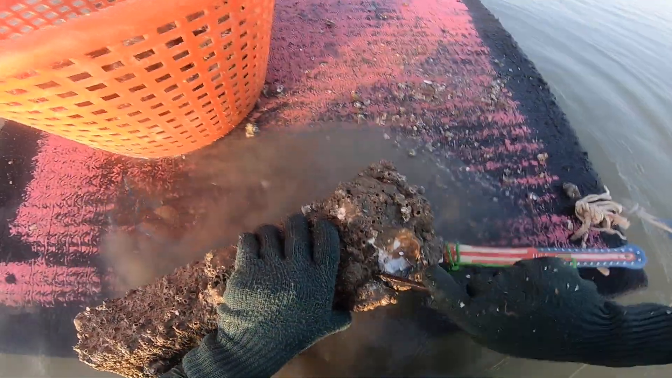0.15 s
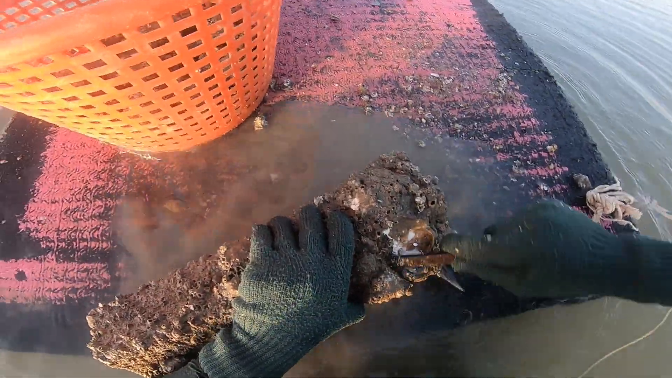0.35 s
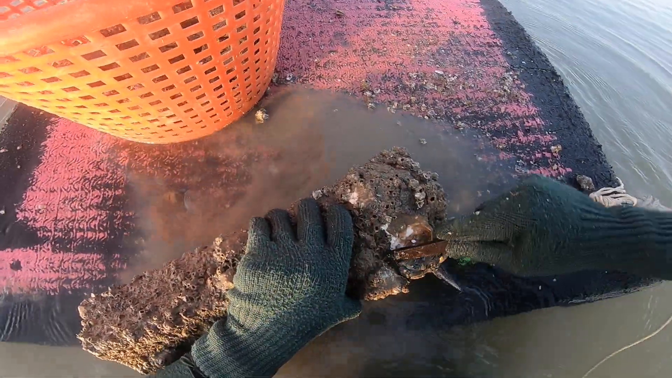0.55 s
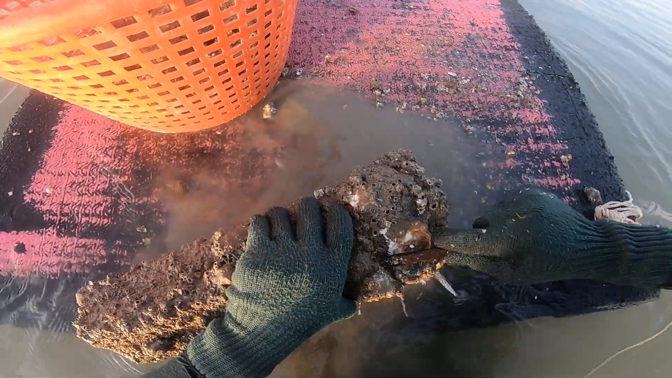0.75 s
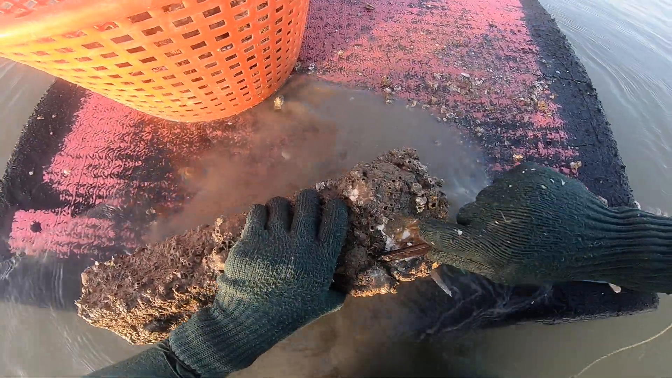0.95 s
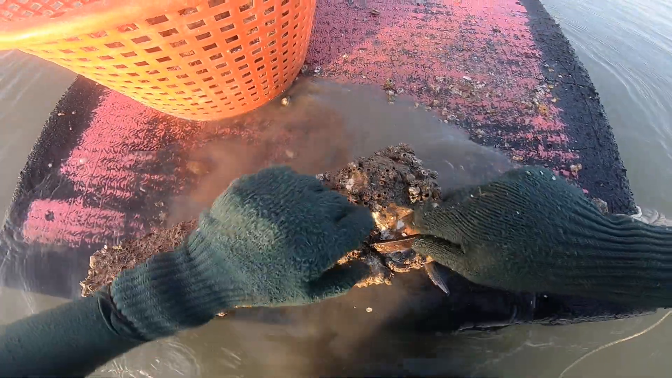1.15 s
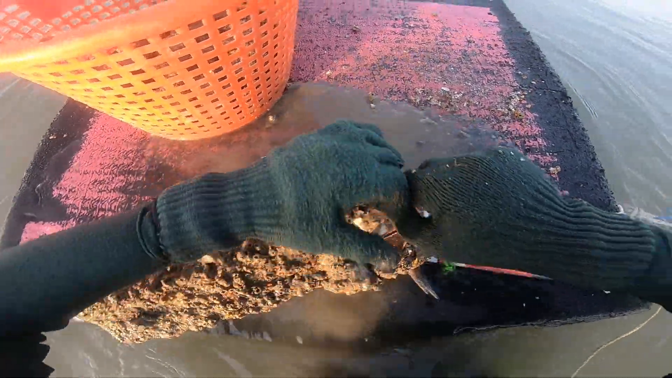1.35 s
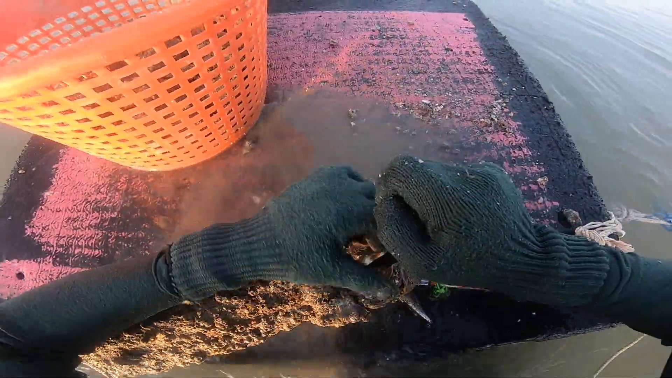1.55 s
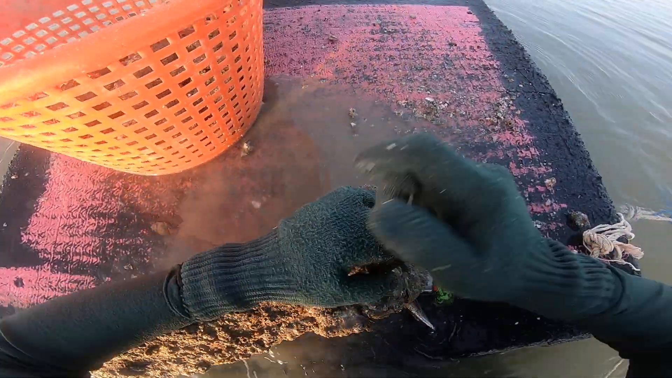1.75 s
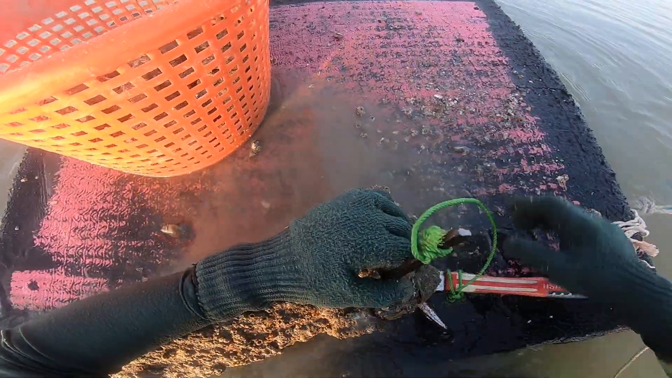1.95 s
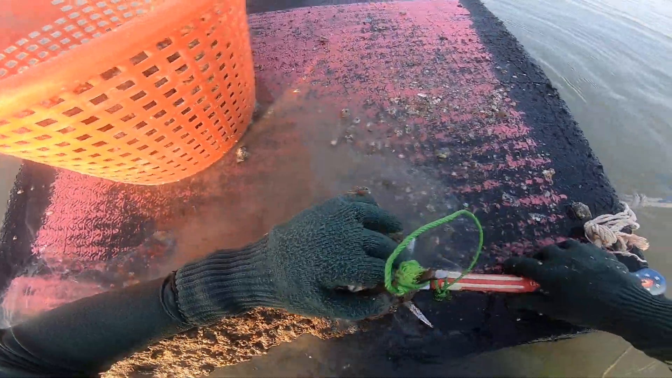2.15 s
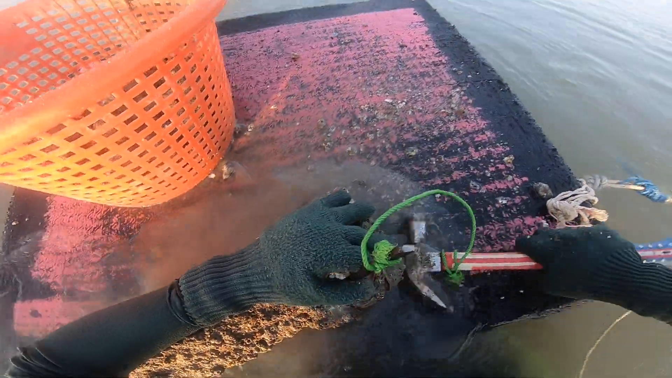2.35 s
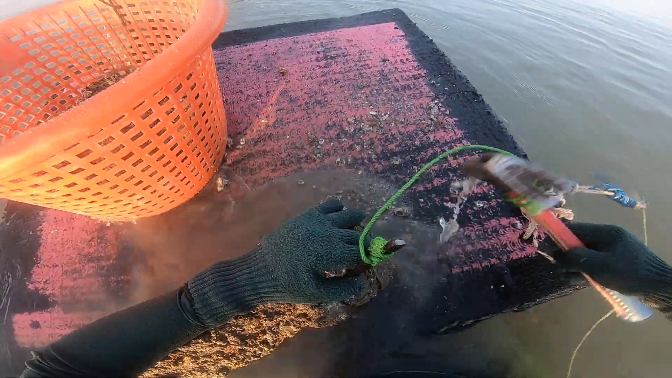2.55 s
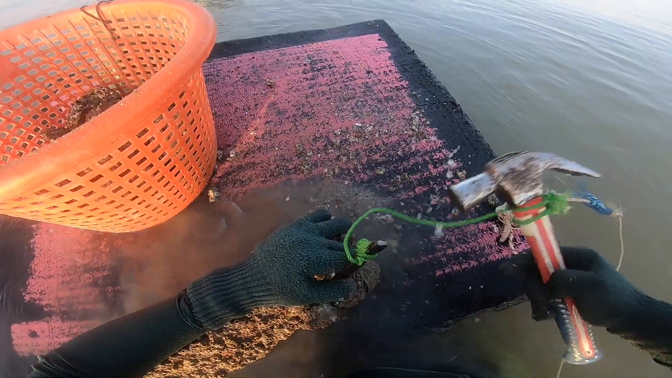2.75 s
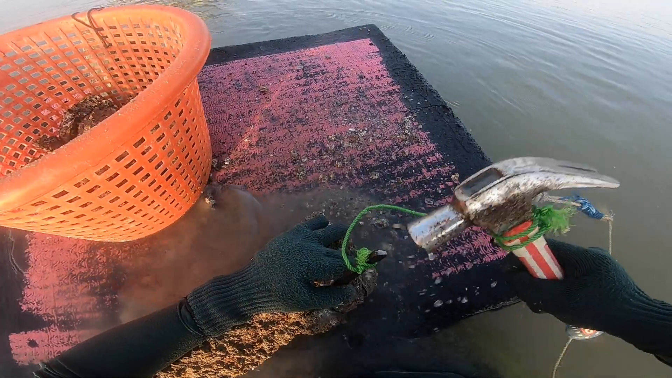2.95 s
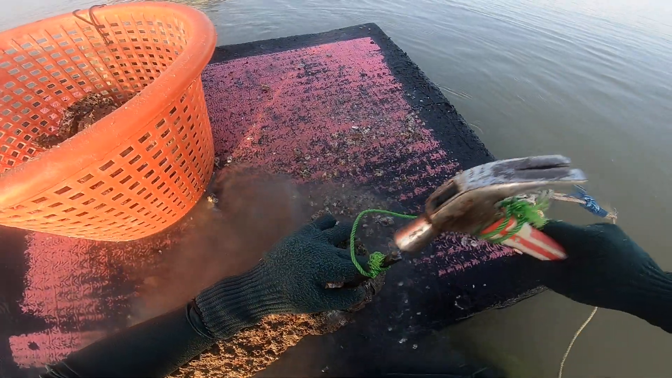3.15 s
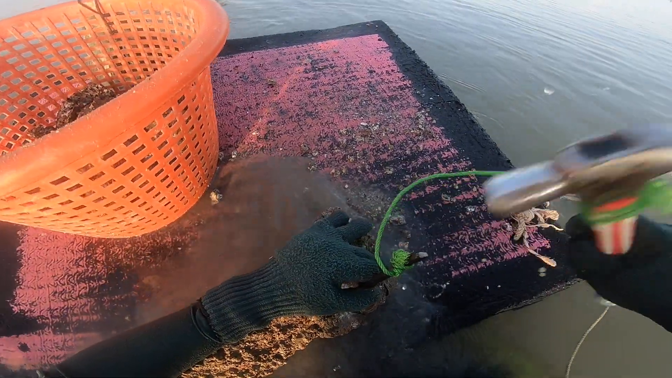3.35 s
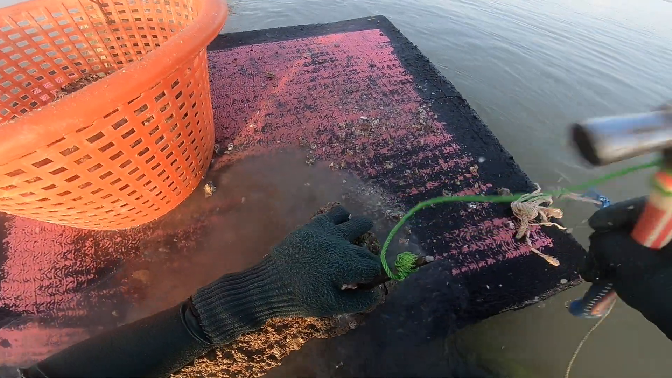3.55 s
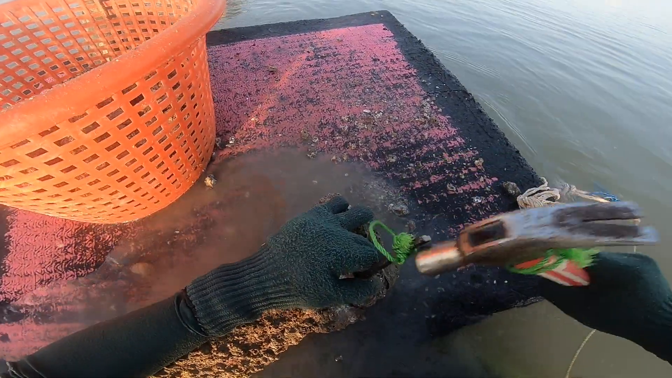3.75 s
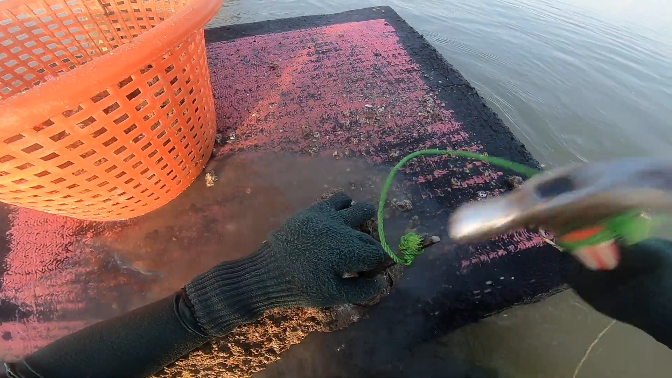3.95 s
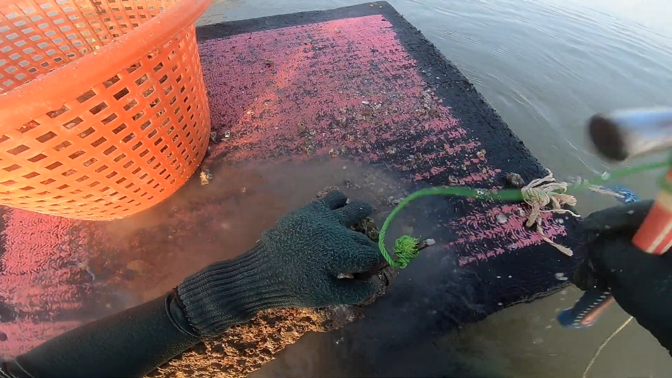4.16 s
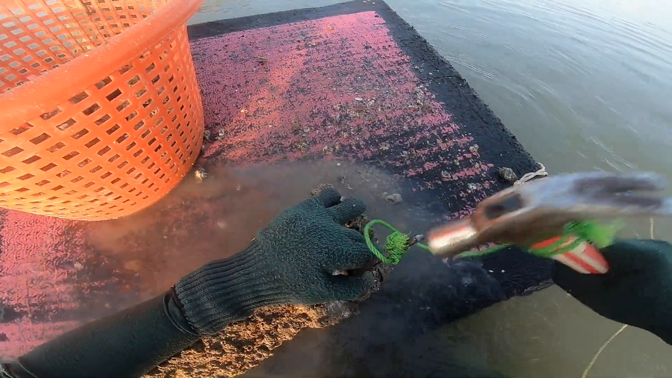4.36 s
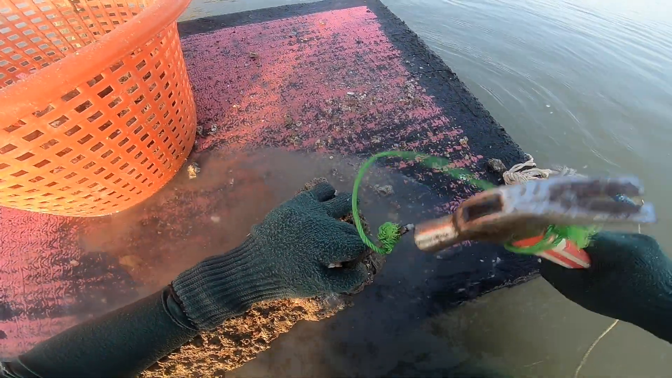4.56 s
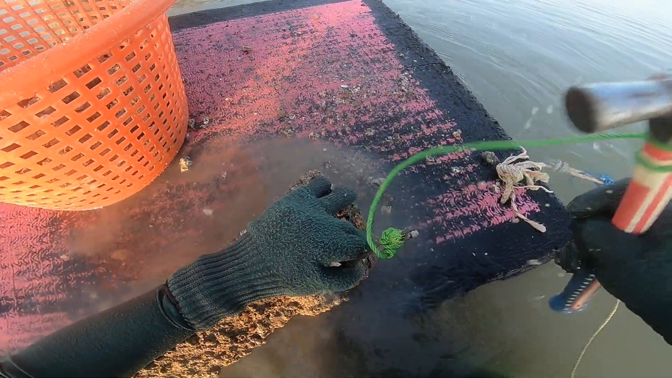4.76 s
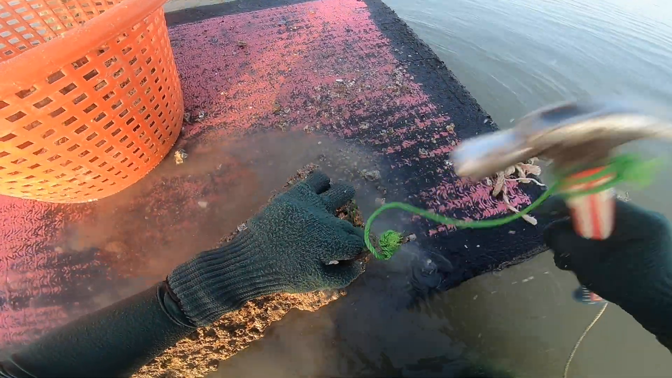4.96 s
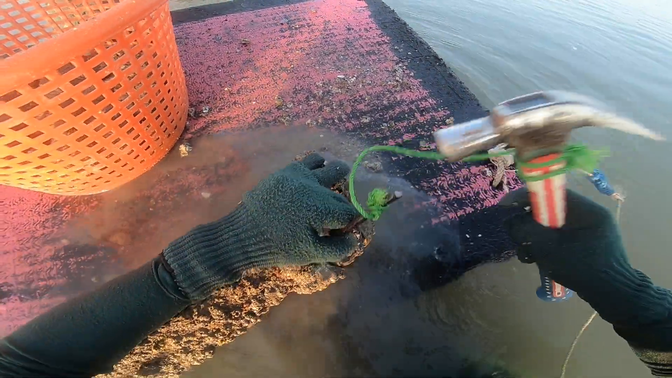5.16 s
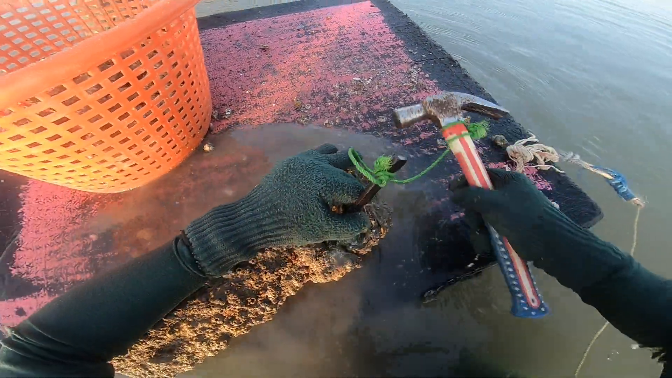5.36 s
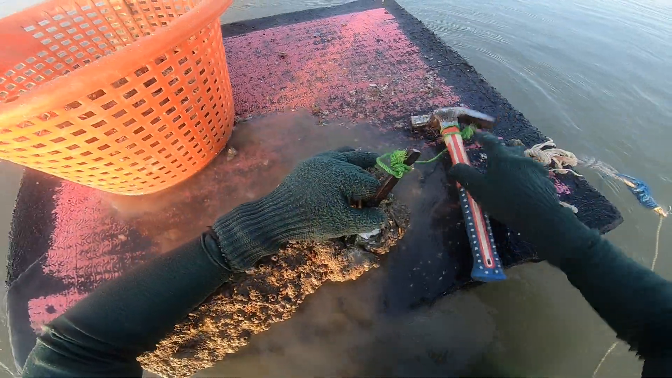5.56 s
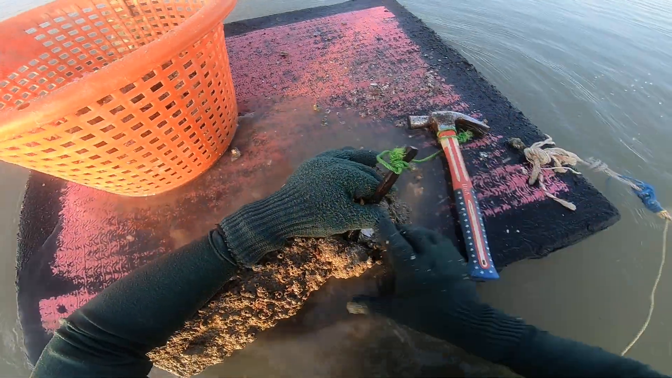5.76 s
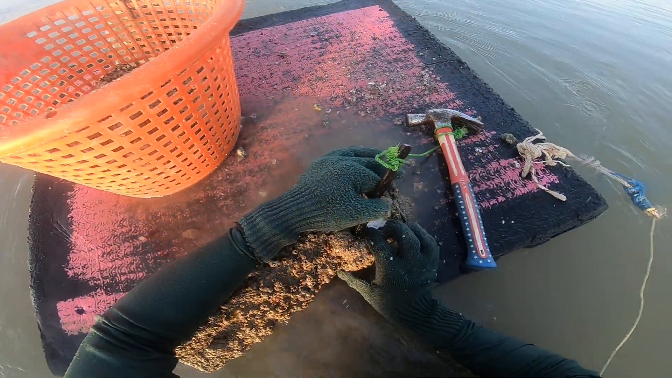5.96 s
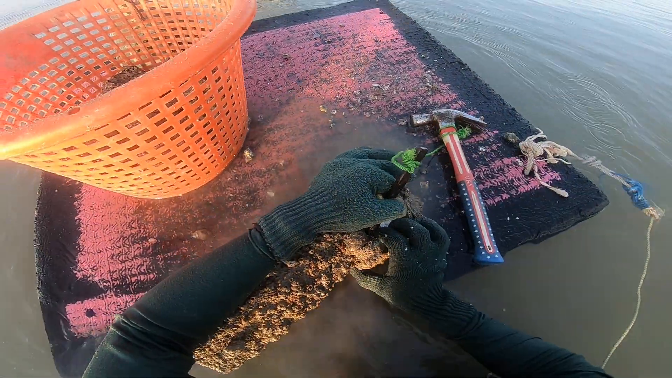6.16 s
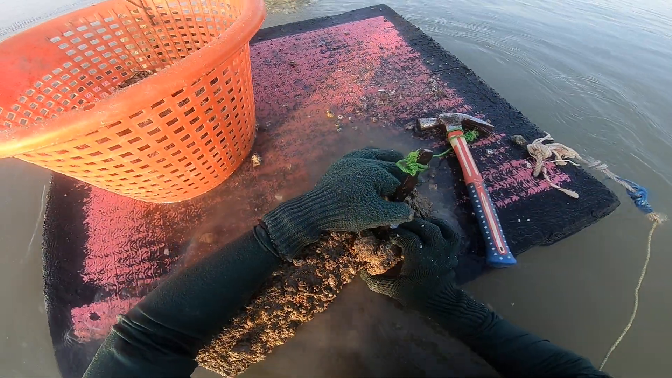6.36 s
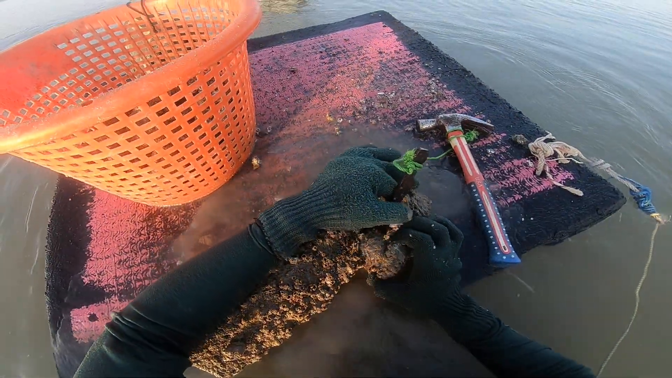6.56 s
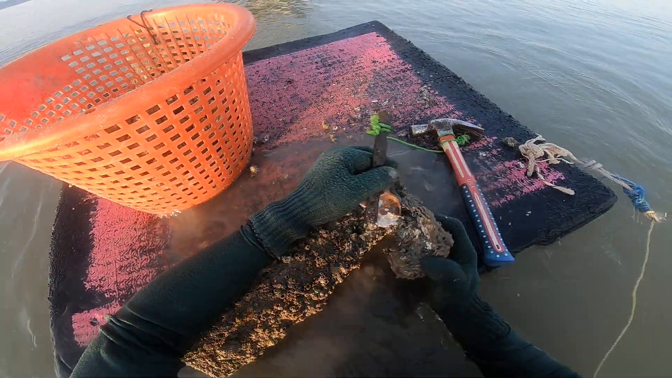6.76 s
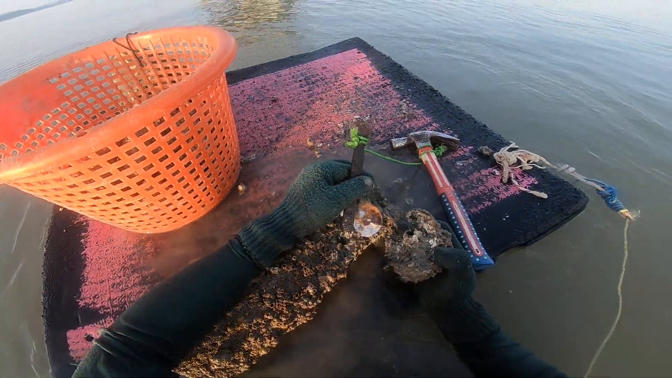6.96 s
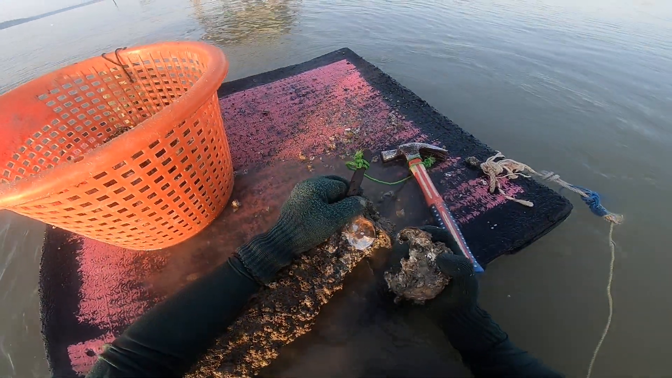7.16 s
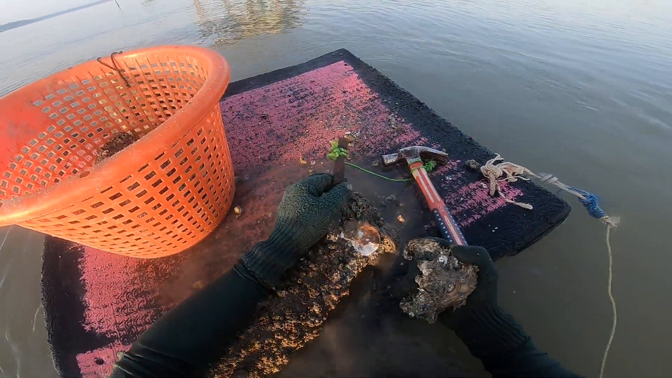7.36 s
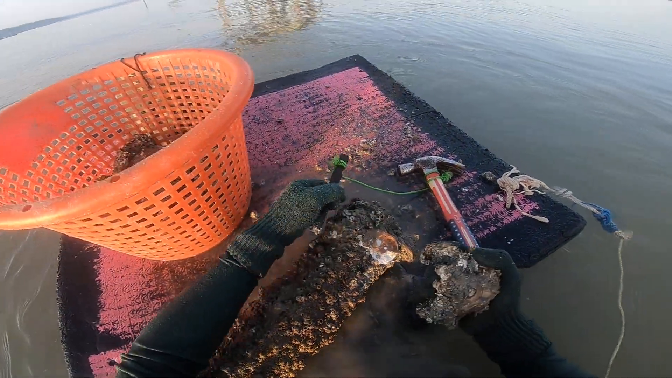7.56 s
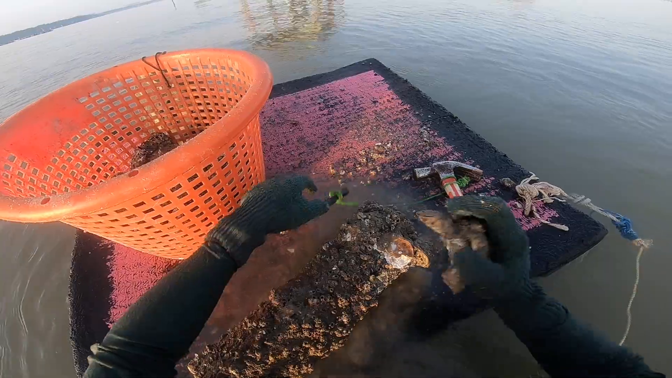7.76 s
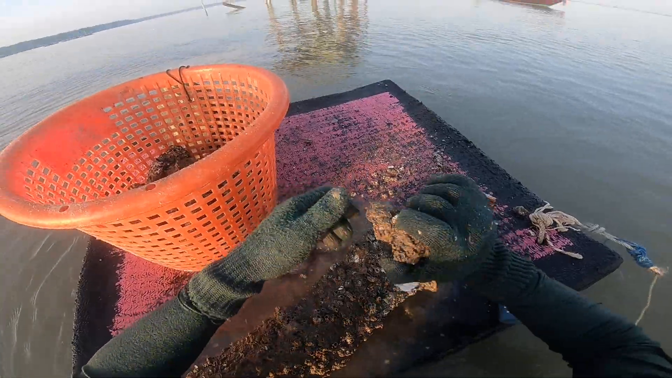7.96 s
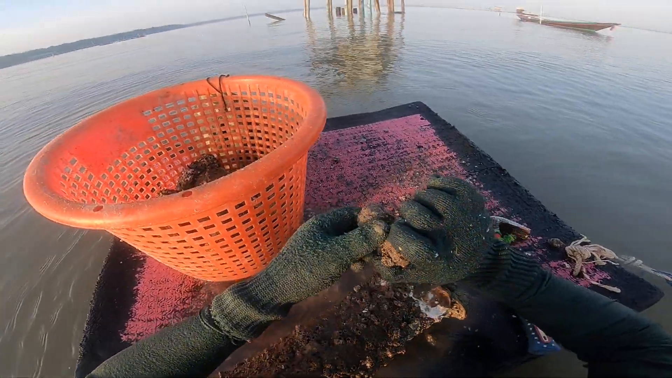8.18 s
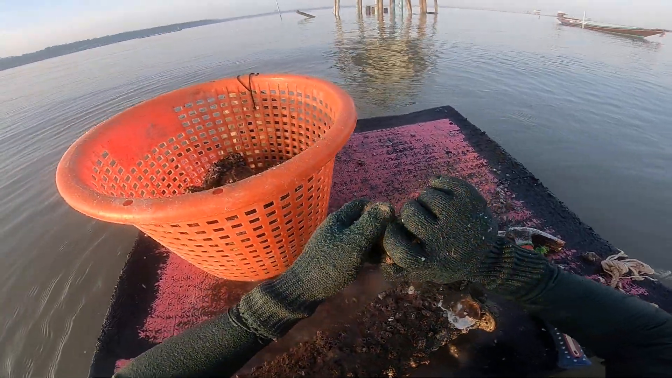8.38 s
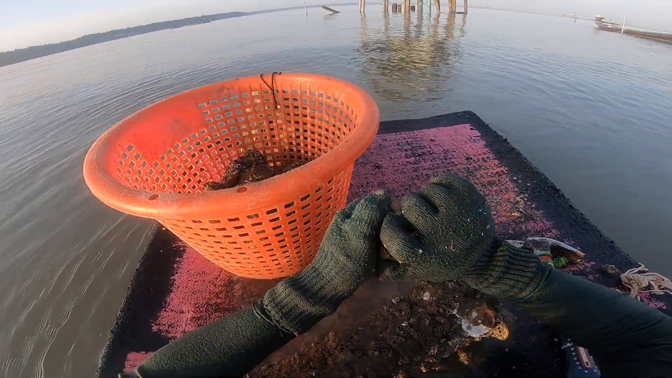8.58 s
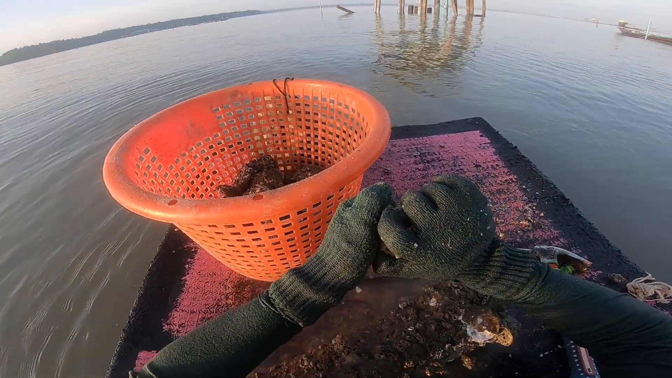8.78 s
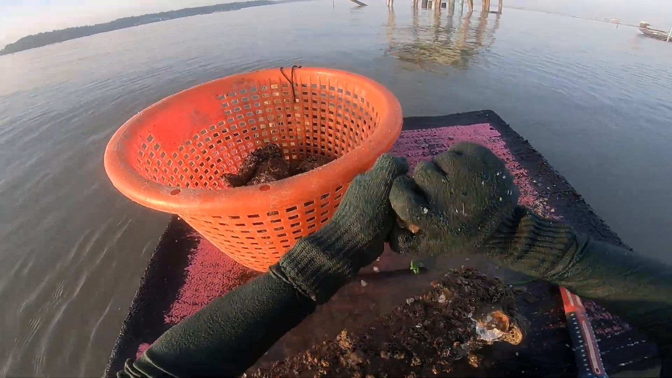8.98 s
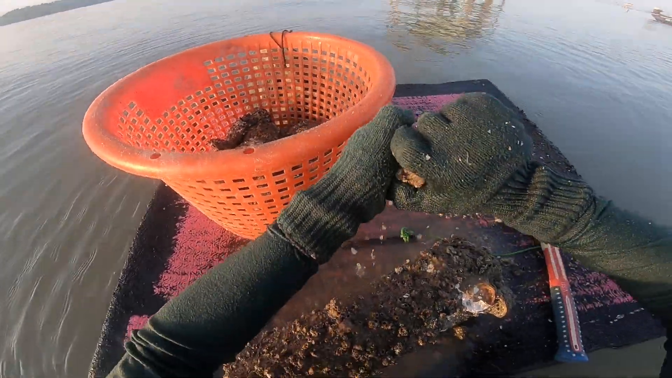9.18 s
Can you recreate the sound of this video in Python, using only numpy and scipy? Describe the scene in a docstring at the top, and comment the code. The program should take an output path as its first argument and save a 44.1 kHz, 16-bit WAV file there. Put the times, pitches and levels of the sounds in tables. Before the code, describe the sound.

A distant one-cylinder engine putters while a hammer cracks brightly on steel seven times, then crusty shells scrape and break apart by hand.

```python
"""A one-cylinder boat engine chugs across the water as periodic pulses ringing a resonant pipe and casing.
With it from the start come wind rumble, fizzing run-off (filtered noise) and the picking of oyster shells.
Water drips and splashes, a hammer is picked up, and seven blows on a steel knife excite decaying modes:
it bounces, the raft deck heaves and rocks, and the last two blows sound hollow. The hammer is laid down, then
shell scrapes on shell and snaps as it is broken free by hand, while the stereo image narrows to mono."""
import sys
import numpy as np
from scipy import signal
from scipy.fft import rfft, irfft, next_fast_len
from scipy.io import wavfile
from scipy.ndimage import uniform_filter1d, minimum_filter1d

SR = 44100
rng = np.random.default_rng(int(sys.argv[2]) if len(sys.argv) > 2 else 0)


def dump(signal):
    """Clip the signal to [-1, 1] and save it as 16-bit WAV at the path in sys.argv[1]."""
    limited = np.clip(np.atleast_2d(signal).T, -1, 1)
    pcm = np.round(limited * 32767).astype(np.int16)
    wavfile.write(sys.argv[1], SR, pcm)


N = 406590
TIME = np.arange(N) / SR
SIZE = next_fast_len(N + SR // 2, True) // 2 * 2  # even transform length, padded against wrap-around
BINS_HZ = np.maximum(np.arange(SIZE // 2 + 1) * SR / SIZE, 1)

# Levels are relative: the functions add weights to them. Noise spectra give a shape only.
# Engine speed: (time [s], firing rate [1/s])
FIRING_RATE = [(0.0, 33.74), (0.6, 33.27), (1.2, 33.02), (1.8, 33.2), (3.0, 33.19), (3.6, 32.98),
               (4.3, 33.34), (5.0, 33.16), (5.6, 33.36), (6.2, 33.04), (6.8, 33.39), (7.4, 33.36),
               (8.0, 33.6), (8.6, 33.32), (9.2, 32.93)]
# Engine loudness: (time [s], exhaust level [dB], clatter level [dB])
ENGINE_LEVEL = [(0.0, -52.5, -61), (0.77, -50.5, -60.5), (1.13, -50.5, -66), (1.56, -47.5, -60),
                (2.18, -49.5, -62), (2.67, -47.5, -59), (3.59, -58, -62.5), (5.13, -52.5, -67.5),
                (5.42, -50.5, -63.5), (8.63, -51, -66.5), (9.22, -52, -65.5)]
# Exhaust pipe resonances: (frequency [Hz], bandwidth [Hz], level [dB])
PIPE_MODES = [(158, 180, 7), (209.9, 20.5, 15), (274, 30, -1), (335, 13.7, -3), (484, 22, -19)]
# Exhaust reflections off nearby surfaces: (delay [s], level [dB])
EXHAUST_ECHOES = [(.0072, 1.5), (0.0117, 0.5), (0.0167, -13)]
# Exhaust gas noise: (frequency [Hz], spectral density [dB])
GAS_SPECTRUM = [(50, -19.5), (100, -21.5), (140, 3), (195, 6), (260, -2.5), (350, -4), (450, -16.5),
                (600, -36.5), (1000, -55)]
# Harmonics of the firing rate: (frequency [Hz], level of a harmonic there [dB])
HUM_SPECTRUM = [(130, -1), (165, -9.5), (198, -2.5), (232, -7), (266, -9), (332, -7.5), (366, -8),
                (400, -21.5), (530, -21.5)]
# Loudness of that hum: (time [s], level [dB])
HUM_LEVEL = [(0, -57), (.5, -52), (1.0, -60), (2.0, -57), (2.9, -53), (4.4, -56), (5.2, -70)]
# Clatter noise in the wide and in the mono image: (frequency [Hz], spectral density [dB])
CLATTER_WIDE_SPECTRUM = [(450, -3.5), (600, 3), (800, 9.5), (1000, 3.5), (1300, 7), (1900, 7), (2600, 6),
                         (2950, -8), (3400, 7.5), (4000, -14), (5400, -15), (7500, -12), (8600, -26),
                         (14000, -59)]
CLATTER_MONO_SPECTRUM = [(450, 3), (560, 0), (780, 11), (1000, -1), (1350, 4.5), (1850, 9), (2700, 1),
                         (3400, 6), (3900, -1), (5600, -17.5), (6800, -8), (8000, -17.5), (12000, -24),
                         (15000, -44)]
# Engine casing modes: (frequency [Hz], level in wide image [dB], level in narrow image [dB], T60 [s])
CASING_MODES = [(3358, -7.5, -9, 0.024), (2608, -3.5, -25, 0.015), (2320, -14.5, -16.5, 0.042),
                (1850, -10, -11.5, 0.024), (4580, -28, -9, 0.003), (5110, -20.5, -6, 0.0088)]
# Rattle of a second engine slipping against the firing: (time [s], turns lost per second [1/s]; negative gains)
RATTLE_SLIP = [(0, .3), (1.2, .5), (1.8, 1.5), (2.4, 1.1), (2.9, -.1), (3.9, -.12), (4.4, .6), (5.5, .15),
               (6.3, .3), (7, 1)]
# Casing rattle against the rest of the clatter: (time [s], level [dB])
RATTLE_LEVEL = [(0.3, -1), (2.0, -1), (3.3, 1), (4.6, -1), (5.42, 5), (5.8, 0), (8.0, -2)]
# Reflection of the ticks off the deck as the head moves: (time [s], delay [s])
DECK_ECHO_DELAY = [(6.5, 0.000913), (6.9, 0.00093), (7.3, 0.00096), (7.8, 0.00088), (8.25, 0.00094),
                   (8.6, 0.001), (9.2, 0.00068)]
# Steady breeze on the microphone: (time [s], level [dB])
BREEZE_LEVEL = [(0.0, -34), (2.39, -46), (3.13, -45), (3.62, -36.5), (4.65, -43), (4.88, -34),
                (5.44, -53.5), (5.8, -43.5), (7.19, -71), (7.45, -56.5), (8.65, -61), (9.12, -33),
                (9.22, -49.5)]
# Gusts on the microphone: (peak time [s], level [dB])
GUSTS = [(0.083, -17), (0.429, -29), (0.756, -19.5), (5.479, -33), (5.898, -31), (7.62, -43.5),
         (8.97, -28.5)]
# Low turbulence: (frequency [Hz], spectral density [dB])
RUMBLE_SPECTRUM = [(10, -11), (18, 8), (27, 0.5), (40, 0), (55, -8), (80, -19.5), (120, -27), (250, -38.5),
                   (600, -99)]
# Fizz of water running off shells and deck: (time [s], level [dB])
FIZZ_LEVEL = [(0.0, -63.5), (1.43, -60.5), (3.77, -61.5), (4.08, -66), (5.8, -63), (6.83, -60.5),
              (8.63, -58), (9.22, -60.5)]
# Run-off and splash: (frequency [Hz], spectral density [dB])
WATER_SPECTRUM = [(1000, 3.5), (3000, -1.5), (4700, 4), (5700, 4.5), (7000, -13.5), (8500, -17.5),
                  (12000, -33.5)]
# Drops falling in the water: (time [s], level [dB], starting frequency [Hz])
DROPS = [(2.46, -50, 1236), (8.157, -57.5, 1540)]
# Shell cracking: (time [s], level [dB], hold [s])
CRUNCHES = [(0.0105, -48, 0.005), (0.047, -45, 0.015), (0.438, -55, 0.0033), (0.779, -54, 0.031),
            (1.109, -55.5, 0.016), (1.773, -54, 0.014), (2.43, -51.5, 0.03), (5.594, -51, 0.0075),
            (6.48, -50, 0.0065), (7.385, -47, 0.02), (7.8685, -34.5, 0.003), (7.878, -45, 0.014),
            (7.8932, -41, 0.005), (7.949, -48, 0.003), (8.068, -51.5, 0.015)]
# Fingers and knife picking at the crust: (start [s], end [s])
PICKING = [(0.402, 2.7), (6.299, 8.3)]
# Brittle shell: (frequency [Hz], spectral density [dB])
SHELL_SPECTRUM = [(400, -39), (1200, -2), (1900, 2), (4000, 1), (5500, 13), (7000, -1), (9000, -23.5),
                  (12000, -33), (15000, -42)]
# Knife and wet gloves rubbing: (peak time [s], half length [s], level [dB], centre [Hz], bandwidth [Hz])
RUBS = [(.0135, .003, -42.5, 2400, 1000), (.04, .004, -49, 2400, 900), (.0525, .0045, -44, 2600, 1500),
        (.62, .1, -62, 2450, 350), (1.56, .16, -63, 2300, 400), (6.85, .13, -63, 4750, 450),
        (8.65, .12, -65, 5250, 700)]
# Deck under a soft bump: (frequency [Hz], spectral density [dB])
BUMP_SPECTRUM = [(30, 9), (90, 17), (220, 10), (400, -19), (1500, -71)]
# Hammer blows on the knife: (time [s], crack level [dB], shank ring [dB], blade ring [dB], knock level [dB],
# clang frequency [Hz], raft heave [dB])
BLOWS = [(3.1713, -7, -17, -23.5, -12.5, 5320, -23), (3.4501, -0.5, -37, -12, -11, 5430, -16.5),
         (3.7239, 1.5, -7, -12, -10, 5040, -8), (4.0244, -3.5, -4, -6, -6, 5270, -13.5),
         (4.315, -6, -2, -28, -7.5, 5700, -16), (4.6030, -2.5, -8.5, -8.5, -4, 5080, -15.5),
         (4.8834, -1.5, -29, -11, -6, 5450, -14)]
# Hammer bounces: (time [s], crack level [dB], shank ring [dB], blade ring [dB], knock level [dB])
BOUNCES = [(3.8197, -22, -36, -35, -14.5), (4.1073, -20, -34, -28, -16), (4.1155, -35, -26, -55, -26),
           (4.4024, -28.5, -28, -29, -12.5), (4.6675, -25.5, -27, -23.5, -16.5)]
# Hammer laid on the deck: (time [s], crack level [dB], shank ring [dB], blade ring [dB], knock level [dB])
LAID_DOWN = [(5.5635, -33.5, -52, -49, -10), (5.6280, -29.5, -28, -28, -23)]
# Gritty contact, struck body, and deck under a hard knock: (frequency [Hz], spectral density [dB])
CRACK_SPECTRUM = [(500, -40), (1000, -20), (1550, -13.5), (2000, -6.5), (2600, 1), (3500, -2.5),
                  (4500, -6.5), (5400, 11.5), (6400, -9), (7900, -5.5), (8600, -29), (9600, -34),
                  (12000, -48)]
KNOCK_SPECTRUM = [(80, -2), (220, 16), (380, 10.5), (560, -11), (850, -9), (1200, 4), (1650, 3.5),
                  (2500, 2.5), (4000, -30), (9000, -56)]
DECK_KNOCK_SPECTRUM = [(150, 4), (350, 1), (600, 0.5), (900, 14), (1400, -4), (2600, 7), (3500, -1),
                       (5000, -50), (9000, -63)]
# Knife shank and blade modes: (frequency [Hz], level [dB], T60 [s])
SHANK_MODES = [(4090, -8, 0.039)]
BLADE_MODES = [(5340, -9, 0.175), (5375, -4, 0.031), (5900, -29, .08), (4712, -25, 0.06), (7450, -33, 0.08),
               (7900, -33, 0.12)]
# Hammer head on knife: (multiple of the clang frequency [1], level against the crack [dB], T60 [s])
CLANG_MODES = [(1, -6, 0.015), (1.16, -14, 0.008)]
# Blows that sound hollow as the oyster loosens: (time [s], level [dB])
LOOSENING = [(4.603, -5), (4.8834, 0)]
# Modes of that hollow: (frequency [Hz], level [dB], T60 [s])
HOLLOW_MODES = [(430, -25, .016), (690, -26, .012), (1020, -24, .014), (2680, -16, .014),
                (4715, -17.5, .03)]
# Shell grinding on shell: (time [s], hold [s], squeal level [dB], rasp level [dB])
SCRAPES = [(6.275, 0.032, -49.5, -46.5), (6.417, 0.026, -49, -59), (6.453, 0.031, -42, -49),
           (6.605, 0.027, -57, -69), (6.7, 0.019, -69, -46.5)]
# Colours of the grinding: (frequency [Hz], spectral density [dB])
SQUEAL_SPECTRUM = [(1500, -42), (2900, -18), (3190, 8.5), (3550, -7), (5000, -52), (5900, -5), (6220, -3.5),
                   (6600, -27), (7600, -15), (9000, -44)]
RASP_SPECTRUM = [(1000, -11), (2500, -10), (4300, -11), (5300, 6.5), (6300, -6), (7300, -15), (9000, -55),
                 (14000, -52)]
# Stereo width: (time [s], share of the side signal kept [0-1])
STEREO_WIDTH = [(0, 0.86), (5.95, 0.95), (6.3, 0.28), (6.7, 0.07), (7.1, 0.01)]
# Ambience between the ears: (frequency [Hz], gain of the side signal [dB])
SIDE_GAIN = [(30, -8.5), (100, 1.5), (250, -8.5), (550, 10), (2000, -2.5), (5000, 2.5), (12000, 2)]
# Balance of the ears: (frequency [Hz], left minus right [dB])
EAR_BALANCE = [(30, -1), (70, 5), (150, -4), (300, -10), (900, -1), (1600, 0.5), (2500, -4), (3400, -2.5),
               (5000, -3.5), (8500, -0.5)]
# Head shadow at the left ear: (frequency [Hz], gain [dB])
HEAD_SHADOW = [(500, -7.5), (1200, -9.5), (2500, -3.5), (4000, -12), (5300, -11.5), (7000, -10),
               (7900, -17.5), (8600, -1.5), (12000, -0.5)]


def from_db(db):
    """Logarithmic level: 20 dB is a factor of ten in amplitude."""
    return 10 ** (np.asarray(db) / 20)


def rms_one(x):
    """Power normalisation: scale to unit root mean square."""
    return x / np.sqrt(np.mean(x ** 2) + 1e-20)


def in_time(rows):
    """Linear interpolation: each column of a curve at every sample."""
    s, *columns = np.transpose(rows)
    return [np.interp(TIME, s, column) for column in columns]


def gains(points):
    """Frequency response: interpolate dB over log frequency, as a gain at every bin."""
    hz, db = np.transpose(points)
    return from_db(np.interp(np.log(BINS_HZ), np.log(hz), db))


def coloured(x, spectrum):
    """Minimum-phase filtering: folding the cepstrum makes it causal; white noise keeps its power."""
    cepstrum = irfft(np.log(rms_one(gains(spectrum))))
    cepstrum[1:SIZE // 2] *= 2
    cepstrum[SIZE // 2 + 1:] = 0
    response = np.exp(rfft(cepstrum))
    return irfft(rfft(x, SIZE) * response)[..., :N]


def band(x, low_hz, high_hz, order=2):
    """Band-pass filtering: keep a single region of frequency."""
    return signal.sosfilt(signal.butter(order, [low_hz, high_hz], "band", fs=SR, output="sos"), x)


def ring(x, hz, t60):
    """Damped resonance: a unit click excites a decaying sine of initial height 1."""
    radius = from_db(-60 / (t60 * SR))
    angle = 2 * np.pi * hz / SR
    return signal.lfilter([0, np.sin(angle)], [1, -2 * radius * np.cos(angle), radius * radius], x + 1e-18)


def clicks(times, sizes):
    """Impulse excitation: single-sample kicks at the given times."""
    out = np.zeros(N)
    samples = np.round(np.asarray(times) * SR).astype(int)
    out[np.clip(samples, 0, N - 1)] = sizes
    return out


def burst(start, rise, hold, t60):
    """Contact envelope: a linear rise, and exponential decay once the hold time has passed."""
    out = np.zeros(N)
    first = max(int(start * SR), 0)
    age = TIME[:min(SR // 2, N - first)]
    decay = from_db(-60 * np.maximum(age - hold, 0) / t60)
    out[first:first + len(age)] = np.minimum(age / rise, 1) * decay
    return out


def swell(centre, half_length):
    """Gaussian envelope: a smooth rise and fall."""
    return np.exp(-.5 * ((TIME - centre) / half_length) ** 2)


def grains(per_s, spread_db):
    """Random impulse process: sparse clicks of uneven size and sign, unit rms."""
    sizes = from_db(spread_db * np.minimum(rng.exponential(1, N), 4))
    present = rng.random(N) < per_s / SR
    return rms_one(sizes * rng.choice([-1, 1], N) * present)


def noise():
    """Statistical independence: two unrelated white noises, as mid and side."""
    return rng.standard_normal((2, N))


def drift(rate):
    """Low-frequency random modulation: interpolated chance values, spread about 1."""
    knots = rng.standard_normal(int(TIME[-1] * rate) + 3)
    return np.interp(TIME * rate, np.arange(len(knots)), knots) * np.sqrt(1.5)


def exhaust(fired, puff, pipe_db=-8.0, gas_db=-8.5):
    """Pipe resonance: nearly even pulses ring the pipe; echoes and gas noise fill the gaps."""
    chance = rng.standard_normal((len(fired), 2))
    pulses = clicks(fired + .0001 * chance[:, 0], from_db(chance[:, 1]))
    pipe = np.zeros(N)
    for hz, width_hz, db in PIPE_MODES:
        t60 = np.log(1000) / np.pi / width_hz  # a narrow resonance decays slowly
        pipe += from_db(db) * width_hz * ring(pulses, hz, t60)
    pipe = rms_one(band(pipe, 140, 560))
    echoes = sum(from_db(db) * np.interp(TIME - delay, TIME, pipe) for delay, db in EXHAUST_ECHOES)
    gas = coloured(noise() * puff, GAS_SPECTRUM)
    mid_side = np.array([pipe + 0.43 * echoes, rms_one(echoes)])
    return from_db(pipe_db) * mid_side + from_db(gas_db) * gas


def hum(turns, waver_db=3.0):
    """Harmonic series: multiples of the firing rate, each wavering on its own in level and phase."""
    hz, db = np.transpose(HUM_SPECTRUM)
    out = np.zeros(N)
    for k in range(4, 17):
        level_db = np.interp(k * FIRING_RATE[0][1], hz, db) + waver_db * drift(4.4)
        wander = .11 * drift(5) + .035 * drift(25)
        out += from_db(level_db) * np.sin(2 * np.pi * (k * turns + wander + rng.random()))
    level = np.sqrt(2) * from_db(in_time(HUM_LEVEL)[0])
    return level * out * np.array([[1], [.2]])  # mid, side


def casing(fired, turns, width, second_db=-6):
    """Modal excitation: firings tap the casing; a weaker rattle from a second engine, running at a slightly
    different speed, slips in and out of step."""
    second_turns = turns - .14 - np.cumsum(in_time(RATTLE_SLIP)[0]) / SR
    slipped = TIME[1:][np.diff(np.floor(second_turns)) > 0]
    times = np.r_[fired, slipped]
    tap_db = np.r_[np.zeros(len(fired)), np.full(len(slipped), second_db)]
    stroke_db = rng.normal(0, 2, len(times))  # unevenness shared by all modes
    out = np.zeros((2, N))
    for hz, wide_db, narrow_db, t60 in CASING_MODES:
        late = rng.normal(0, .0007, (2, len(times)))  # mid and side times differ [s]
        uneven_db = stroke_db + rng.normal(0, 3.2, len(times))
        taps = np.array([clicks(times + lag, from_db(tap_db + uneven_db)) for lag in late])
        taps = taps * from_db(2 * drift(3))
        near_mode = band(taps + 1e-18, .8 * hz, 1.2 * hz)
        mode_db = narrow_db + width * (wide_db - narrow_db)
        out += from_db(mode_db) * rms_one(ring(near_mode, hz, t60))
    return from_db(in_time(RATTLE_LEVEL)[0]) * out


def off_deck(x, echo_share=0.25):
    """Comb filtering: a close, moving reflection lays shifting peaks over the engine's ticks."""
    ticks = band(x, 3700, 6200)
    heard_from = TIME - in_time(DECK_ECHO_DELAY)[0]
    return x + echo_share * np.array([np.interp(heard_from, TIME, channel) for channel in ticks])


def engine(width, puff_turns=0.13, between=0.42):
    """Periodic excitation: each firing thumps the pipe, spits a puff of noise and rattles the casing."""
    exhaust_db, clatter_db = in_time(ENGINE_LEVEL)
    turns = np.cumsum(in_time(FIRING_RATE)[0]) / SR - .13  # phase in firing cycles
    fired = TIME[1:][np.diff(np.floor(turns)) > 0]
    puff = rms_one(between + np.exp(-(turns % 1) / puff_turns))
    spit = noise() * puff
    clatter = width * coloured(spit, CLATTER_WIDE_SPECTRUM)
    clatter += (1 - width) * coloured(spit, CLATTER_MONO_SPECTRUM)
    clatter += casing(fired, turns, width)
    image_db = width * 0.5 + (1 - width) * 2  # clatter weight in the wide and the mono image
    out = from_db(exhaust_db + 5) * exhaust(fired, puff) + hum(turns)
    return out + from_db(clatter_db + image_db) * off_deck(clatter)


def wind(breeze_db=5.5, gust_s=0.018):
    """Turbulent pressure at the microphone ports: low noise under a changing breeze and short gusts."""
    breeze = from_db(in_time(BREEZE_LEVEL)[0] + breeze_db)
    gusts = sum(from_db(db) * swell(s, gust_s) for s, db in GUSTS)
    return np.hypot(breeze, gusts) * coloured(noise(), RUMBLE_SPECTRUM)  # powers add


def drop(start, db, hz, t60=0.074, rise_per_s=0.77):
    """Bubble resonance: a decaying sine climbs in pitch, by a share of its start pitch per second."""
    age = TIME - start
    cycles = hz * age * (1 + rise_per_s * age / 2)
    return from_db(db) * burst(start, 0.00051, 0.0094, t60) * np.sin(2 * np.pi * cycles)


def water(runoff_db=-6):
    """Superposition of tiny impacts: fizzing run-off, a splash off the lifted hammer, and drops."""
    flow = from_db(in_time(FIZZ_LEVEL)[0] + runoff_db)
    flow += from_db(-62) * swell(2.74, 0.058)  # the splash
    fizz = flow * coloured(np.array([grains(3700, 3.0), grains(2400, 3.2)]), WATER_SPECTRUM)
    drops = sum(drop(*row) for row in DROPS)
    return fizz + drops * np.array([[1], [.4]])  # mid, side


def crumbs(per_s=3.6, mean_db=-58.5, spread_db=7.5, hold_s=0.0058):
    """Jittered event process: one faint crunch at a random moment of each short interval of picking."""
    out = []
    for start, end in PICKING:
        count = max(int((end - start) * per_s), 1)
        for s in np.linspace(start, end, count, endpoint=False):
            late, size = rng.random(2)
            out.append((s + late / per_s, mean_db + spread_db * (2 * size - 1), hold_s))
    return out


def shells(snap_db=-1):
    """Brittle fracture: shell gives way with a snap and a dense shower of splinters."""
    shower = grains(1500, 3.5)
    effort = np.zeros(N)
    for s, db, hold in list(CRUNCHES) + crumbs():
        effort += from_db(db) * (burst(s, .002, hold, .025) + burst(s, .0005, .002, .012))
    return from_db(snap_db) * coloured(effort * shower, SHELL_SPECTRUM)


def rubs():
    """Friction noise: knife and wet gloves rub as swells of fine grit, each in a band of its own."""
    grit = grains(1300, 3)
    out = np.zeros(N)
    for s, half, db, hz, width_hz in RUBS:
        rub = rms_one(band(grit, hz - width_hz / 2, hz + width_hz / 2))
        out += from_db(db) * swell(s, half) * rub
    return out


def deck(heave_hz=35.8, heave_t60=0.097, delay_s=0.015, rocking_db=-14.5):
    """Mass on a spring: the deck bumps at the pick-up, then dips just after each blow and rocks on."""
    bump = from_db(-30) * burst(2.378, 0.0025, 0.015, 0.32)
    bump = bump * coloured(rng.standard_normal(N), BUMP_SPECTRUM)
    shove, sway = np.zeros(N), np.zeros(N)
    for s, *_, db in BLOWS:
        shove += from_db(db) * burst(s + delay_s, 0.0035, 0.008, 0.015)
        sway += from_db(db + rocking_db) * burst(s + delay_s, 0.045, 0.14, 0.15)
    heave = ring(np.gradient(shove), heave_hz, heave_t60)
    rocking = sway * coloured(rng.standard_normal(N), RUMBLE_SPECTRUM)
    return heave + rocking + bump


def soft(x, top_hz):
    """Radiation and contact time: thin steel radiates little bass; finite contacts carry little treble."""
    x = signal.sosfilt(signal.butter(2, 2500, "high", fs=SR, output="sos"), x)
    return signal.sosfilt(signal.butter(6, min(top_hz, .45 * SR), fs=SR, output="sos"), x)


def strikes(rows, body, rise_s, crush_s, crack_t60, tail_db, tail_t60):
    """Impact: a brief gritty contact, a knock from the body beneath, and the steel's ringing modes."""
    times, _, shank_db, blade_db, _ = np.transpose(rows)
    crush, push = np.zeros(N), np.zeros(N)
    for s, crack_db, _, _, knock_db in rows:
        tail = from_db(tail_db) * burst(s, rise_s, crush_s, tail_t60)
        crush += from_db(crack_db) * (burst(s, rise_s, crush_s, crack_t60) + tail)
        push += from_db(knock_db) * burst(s, 0.0068, 0.0041, 0.03)
    crack = from_db(-6.0) * coloured(crush * rng.choice([-1, 1], N), CRACK_SPECTRUM)
    knock = from_db(-14.0) * coloured(push * rng.standard_normal(N), body)
    steel = np.zeros(N)
    for modes, level_db in ((SHANK_MODES, shank_db), (BLADE_MODES, blade_db)):
        for hz, db, t60 in modes:
            kick_db = level_db + db + rng.normal(0, 1, len(times))
            steel += ring(clicks(times + rise_s, from_db(kick_db)), hz, t60)
    return crack + knock + soft(steel, 8400)


def clang(delay_s=.0016):
    """Modal ringing: the hammer head clangs briefly, at a pitch set by where it lands."""
    out = np.zeros(N)
    for s, crack_db, *_, hz, _ in BLOWS:
        for ratio, db, t60 in CLANG_MODES:
            out += ring(clicks([s + delay_s], from_db(crack_db + db)), ratio * hz, t60)
    return soft(out, 6800)


def struck(rows, modes, uneven_db=4.0):
    """Modal superposition: each row's time and level ring every mode, at slightly different instants."""
    times, level_db = np.transpose(rows)[:2]
    out = np.zeros(N)
    for hz, db, t60 in modes:
        late = rng.uniform(.001, .0022, len(times))
        kick_db = level_db + db + rng.normal(0, uneven_db, len(times))
        kicks = clicks(times + late, from_db(kick_db))
        out += ring(band(kicks + 1e-18, .75 * hz, 1.3 * hz, order=1), hz, t60)
    return out


def housing():
    """Structure-borne sound: blows ring the microphone housing, the ears in opposite phase."""
    mode = (8600, -19.5, 0.027)  # frequency [Hz], level against the crack [dB], T60 [s]
    return struck(BLOWS, [mode]) * np.array([[1], [-.7]])


def hollow():
    """Cavity resonance: the last two blows sound hollow as the oyster loosens."""
    return struck(LOOSENING, HOLLOW_MODES)


def scrapes(grain_db=2.5):
    """Stick-slip friction: dense slips of shell on shell, part rasp and part squeal."""
    out = np.zeros(N)
    for column, spectrum in enumerate((SQUEAL_SPECTRUM, RASP_SPECTRUM)):
        effort = np.zeros(N)
        for s, hold, *levels_db in SCRAPES:
            effort += from_db(levels_db[column]) * burst(s, 0.0036, hold, 0.047)
        out += coloured(effort * grains(600, grain_db), spectrum)
    return out


def around(mid_side):
    """Mid-side stereo: spread a distant sound over both ears, with a balance set by frequency."""
    mid, side = rfft(mid_side, SIZE)
    side = side * gains(SIDE_GAIN)
    balance = np.sqrt(gains(EAR_BALANCE))
    return irfft(np.array([(mid + side) * balance, (mid - side) / balance]))[:, :N]


def at_hand(x, lag_samples):
    """Interaural difference: a near sound on the right reaches the left ear later and shadowed."""
    lag = np.exp(-2j * np.pi * BINS_HZ * lag_samples / SR)
    left = irfft(rfft(x, SIZE) * gains(HEAD_SHADOW) * lag)
    return np.array([left[:N], x])


def scene():
    """Superposition: near work over the distant engine; the image narrows to mono towards the end."""
    width = np.clip(in_time(STEREO_WIDTH)[0], 0, 1)
    distant = around(engine(width) + wind() + water())
    steel = strikes([row[:-2] for row in BLOWS], KNOCK_SPECTRUM, rise_s=.0016, crush_s=0.0024,
                    crack_t60=0.012, tail_db=-17, tail_t60=0.036)
    steel += strikes(BOUNCES, KNOCK_SPECTRUM, rise_s=.0007, crush_s=0.003,
                     crack_t60=0.023, tail_db=-16, tail_t60=0.12)
    steel += strikes(LAID_DOWN, DECK_KNOCK_SPECTRUM, rise_s=0.00062, crush_s=0.0035,
                     crack_t60=0.042, tail_db=-10, tail_t60=0.12)
    steel += clang() + hollow()
    near = at_hand(steel + shells() + scrapes(), lag_samples=20)
    left, right = distant + near + housing() + rubs() + deck()
    mid, side = (left + right) / 2, (left - right) / 2
    return mid + width * side * np.array([[1], [-1]])


def record(dry, ceiling_db=-4.0, release_db_per_s=45):
    """Peak limiting: gain drops where peaks pass the ceiling and recovers slowly; the top is cut."""
    peak_db = 20 * np.log10(np.abs(dry).max(axis=0) + 1e-9)
    over_db = np.maximum(peak_db - ceiling_db, 0)
    release_db = release_db_per_s * TIME
    held_db = np.maximum.accumulate(over_db + release_db) - release_db
    gain_db = uniform_filter1d(minimum_filter1d(-held_db, size=45), size=45)  # eases in ahead of the peak
    low_pass = signal.cheby2(12, 70, 15500, fs=SR, output="sos")  # 70 dB down from 15500 Hz
    return signal.sosfilt(low_pass, dry * from_db(gain_db))


dry = scene()
out = record(dry)
dump(out)
```